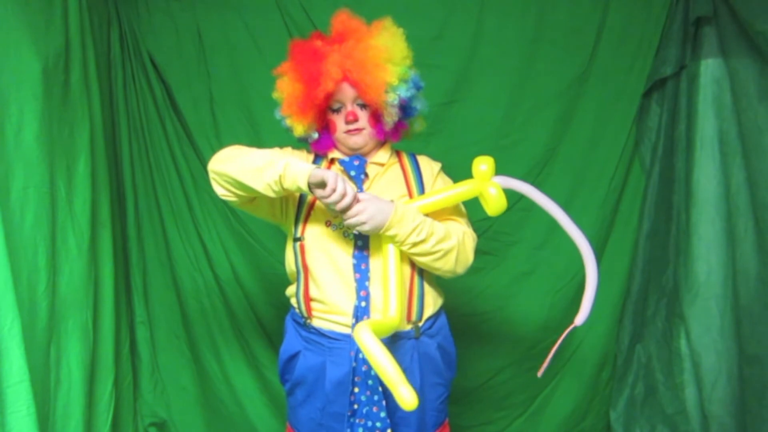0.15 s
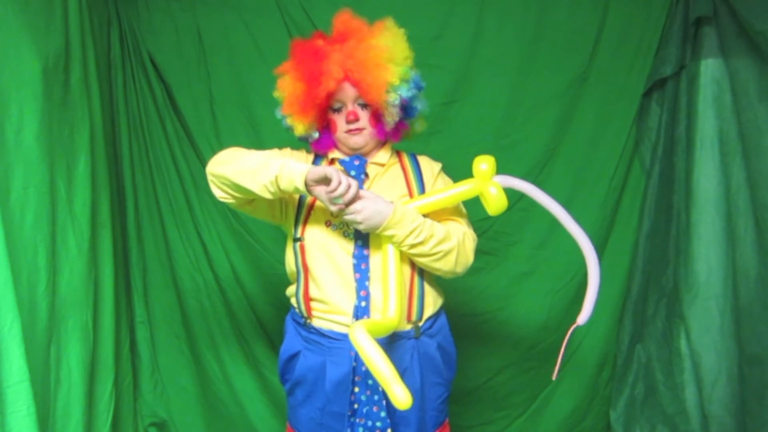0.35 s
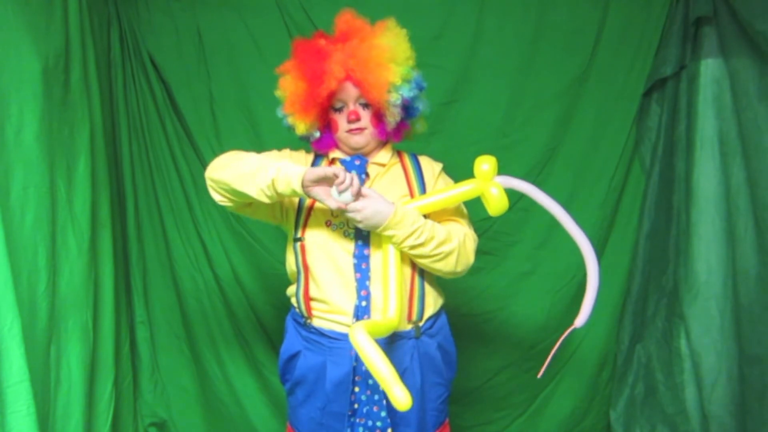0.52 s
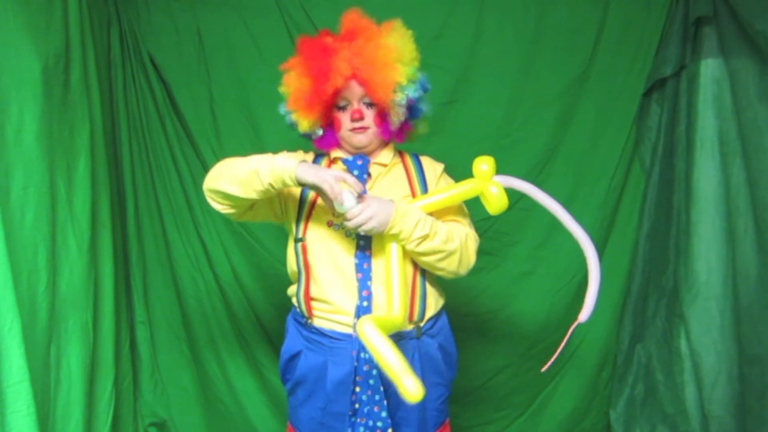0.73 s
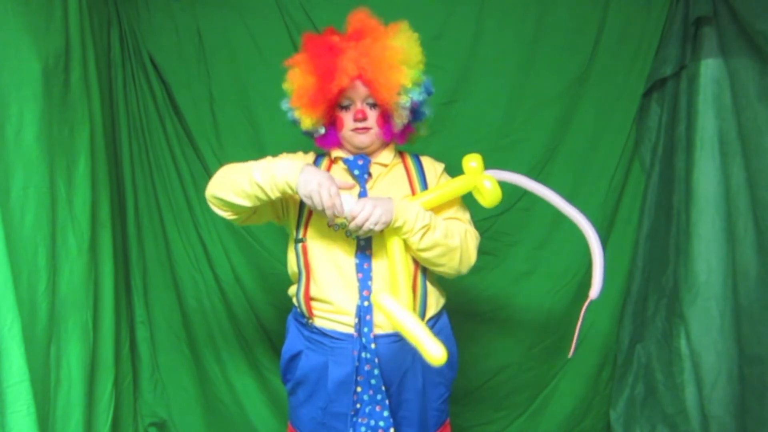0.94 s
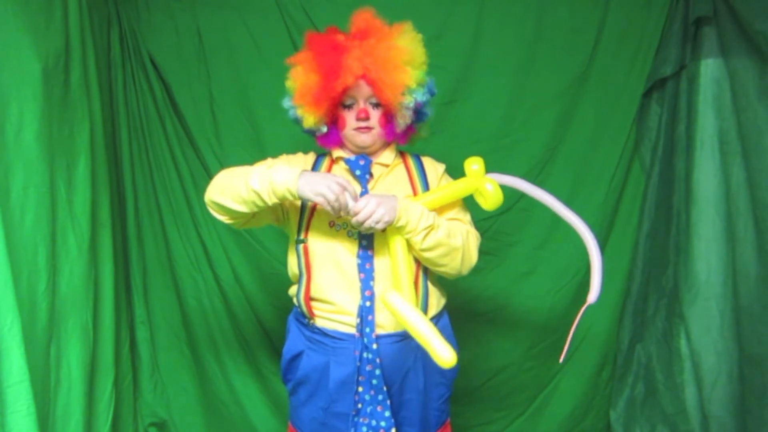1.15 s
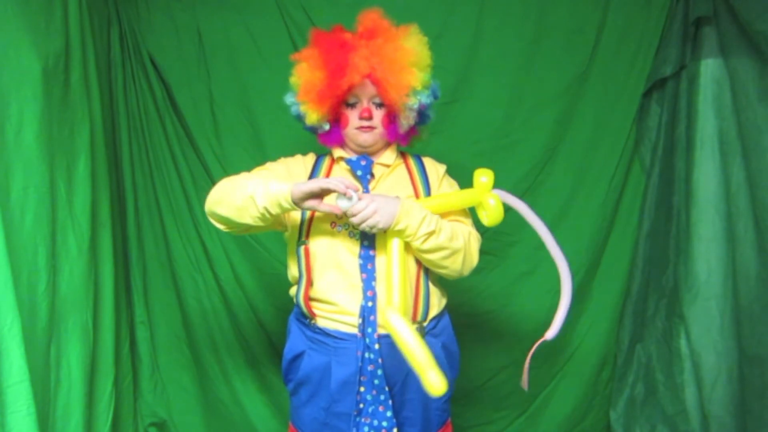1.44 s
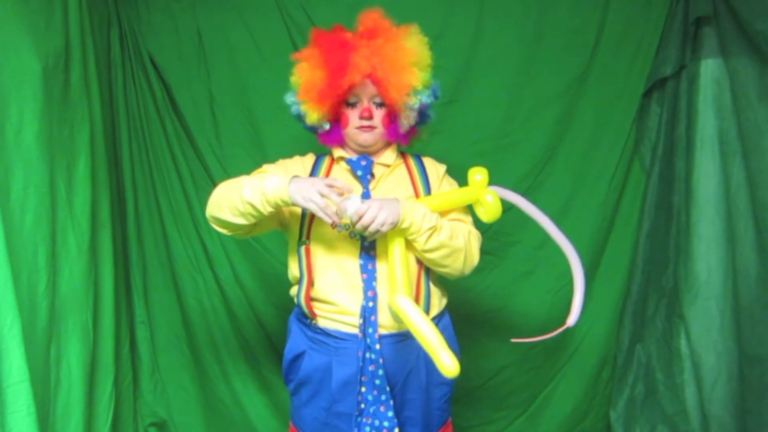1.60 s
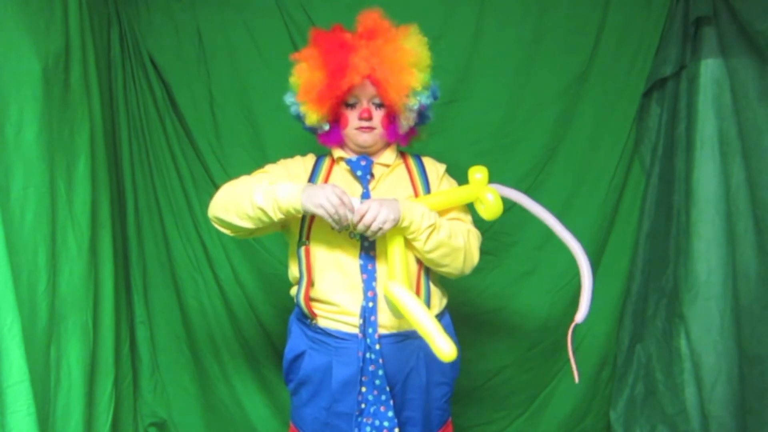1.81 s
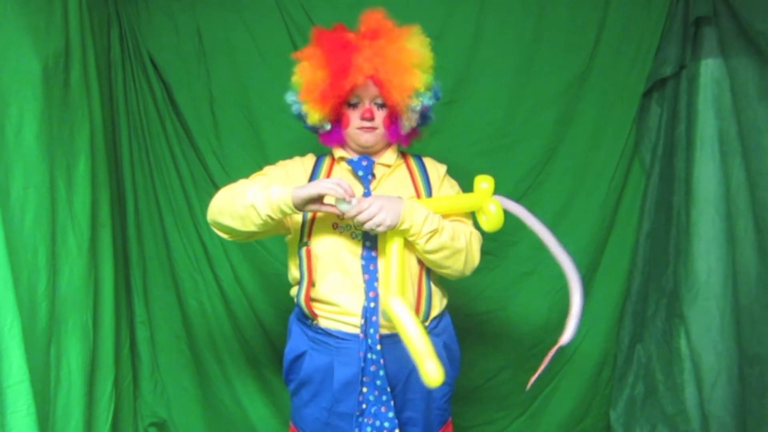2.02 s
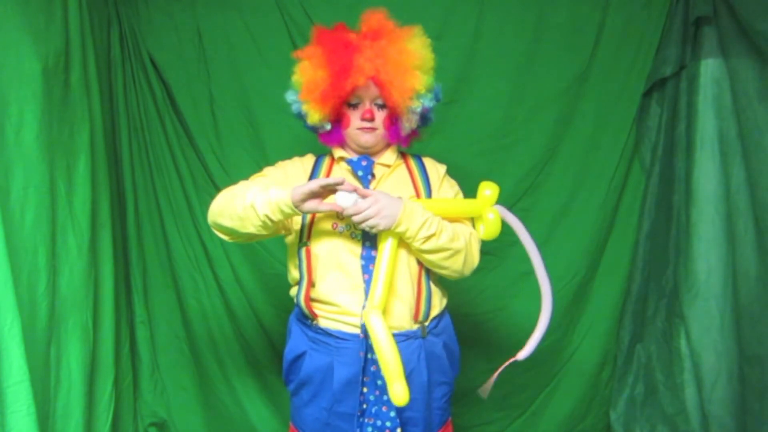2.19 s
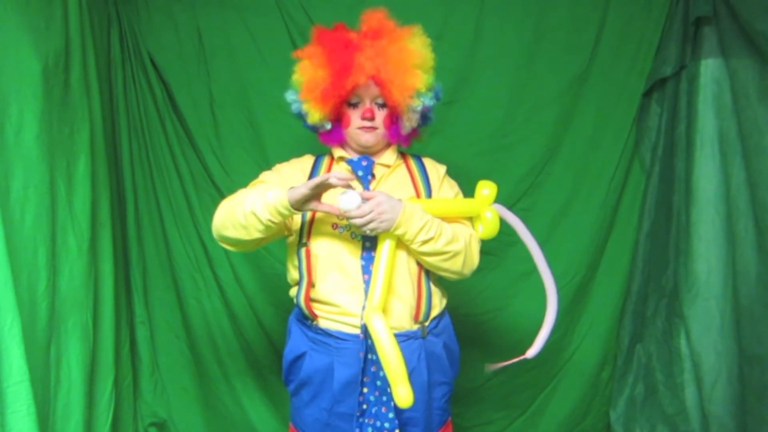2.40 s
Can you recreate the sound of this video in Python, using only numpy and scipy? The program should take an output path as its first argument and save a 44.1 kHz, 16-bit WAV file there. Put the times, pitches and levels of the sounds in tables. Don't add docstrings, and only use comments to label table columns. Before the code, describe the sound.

A small latex balloon is squeezed and twisted by gloved hands. Light, uneven rubbery clicks come until 0.4 seconds, then a hard creaking twist with short squeaks at 0.5-0.75. After a near-silent pause, another strong twist runs 1.1-1.5, with a loud squeak near 1.57. A gentler twist creaks at 1.8-2.3, then faint rubs. Soft fan hum and airy hiss continue in a small, fairly dry room, about two metres away.

```python
import sys
import numpy as np
from scipy import signal
from scipy.io import wavfile
from scipy.ndimage import uniform_filter1d

SR = 44100
rng = np.random.default_rng(int(sys.argv[2]) if len(sys.argv) > 2 else 0)


def wav_out(sig):
    wavfile.write(sys.argv[1], SR, np.round(np.clip(np.atleast_2d(sig).T, -1, 1) * 32767).astype(np.int16))


def amplitude_ratio(level_db):
    exponent = np.asarray(level_db, float) / 20
    return 10 ** exponent


N = 112454


def evened(x):
    return x / np.sqrt(np.mean(x ** 2) + 1e-20)


def read(points, hz):
    f, value = np.transpose(points)
    return np.interp(np.log(hz + 1), np.log(f + 1), value)


def add(mix, s, sound):
    part = mix[round(s * SR):][:len(sound)]
    part += sound[:len(part)]


def wander(rows, length):
    noise = rng.standard_normal((rows, length + 300))
    return signal.lfilter(np.hanning(300), 1, noise)[:, 300:] / np.sqrt(112)


def colour(x, points, under_db=-40):
    hz = abs(np.fft.fftfreq(4096, 1 / SR))
    below = (points[0][0] / 2, points[0][1] + under_db)
    logs = np.log(amplitude_ratio(read([below] + list(points), hz)))
    taps = np.fft.ifft(np.exp(np.conj(signal.hilbert(logs)))).real[:2048]
    taps = taps.reshape((1,) * (x.ndim - 1) + (-1,))
    return signal.oaconvolve(x, taps, axes=-1)[..., :x.shape[-1]]


def resonate(x, hz, width_hz):
    turn = np.exp(2j * np.pi * np.cumsum(hz * np.ones(len(x))) / SR)
    r = np.exp(-np.pi * width_hz / SR)
    return 2 * (turn * signal.lfilter([1 - r], [1, -r], x / turn)).real


# pitch in Hz, width in Hz, level in dB.
FAN_HUMS = [(126.2, 42, -56.5), (333, 35, -59.5), (411, 21, -53)]


def fan():
    t = np.arange(N) / SR
    hum = sum(amplitude_ratio(db) * evened(resonate(rng.standard_normal(N), hz, width)) for hz, width, db in FAN_HUMS)
    for hz, db in ((474, -46), (318, -57)):
        hum = hum + amplitude_ratio(db) * np.sin(2 * np.pi * hz * t)
    return hum


# pitch in Hz, level in dB.
AIR_TONE = [(25, -20.5), (370, -6.5), (460, -7), (1200, -10.5), (2330, -21.5), (6000, -38), (11000, -45.5),
            (16000, -51)]
# pitch in Hz, likeness from -1 to 1.
AIR_LIKENESS = [(30, -0.64), (100, -0.31), (200, 0.31), (400, 0.72), (1000, 0.87), (3770, 0.51),
                (15000, -0.039)]


def air():
    frames, hz = N // 256 + 5, np.fft.rfftfreq(1024, 1 / SR)
    a, b, c, d, patches = rng.standard_normal((frames, 513, 5)).T
    patches = uniform_filter1d(patches, size=12, axis=0)
    patches = evened(uniform_filter1d(patches, size=10, axis=1))
    same = np.clip(read(AIR_LIKENESS, hz), -1, 1)[:, None]
    left = a + 1j * b
    right = same * left + np.sqrt(1 - same ** 2) * (c + 1j * d)
    z = np.array([left, right]) * amplitude_ratio(read(AIR_TONE, hz)[:, None] + 1.6 * patches)
    return amplitude_ratio(-44) * evened(signal.istft(z, nperseg=1024, noverlap=768)[1][:, :N])


# pitch in Hz, time to fall by 60 dB in seconds.
ROOM_FADE = [(300, 0.24), (1000, 0.16), (4000, .18), (10000, 0.16)]


def room(x):
    room_db, wide_db = -5, -11.5
    taps = np.zeros((2, 22000))
    at = np.arange(150, 21900, 20) + rng.integers(0, 20, (2, 1088))
    np.put_along_axis(taps, at, rng.choice([-1., 1.], at.shape), 1)
    hz, t, z = signal.stft(taps, SR, nperseg=256)
    tail = signal.istft(z * amplitude_ratio(-60 * t / read(ROOM_FADE, hz)[:, None]), SR, nperseg=256)[1]
    mid, side = signal.fftconvolve(x[None], tail / np.linalg.norm(tail[0]), axes=1)[:, :N]
    lean = colour(side, [(300, -7.5), (3000, -7), (6000, 3.5), (10000, 6.0)])
    return x + amplitude_ratio(room_db) * mid + amplitude_ratio(wide_db) * np.array([lean, -lean])


def ring(length, level_db, hz):
    waver, rough, octave_db = .008, .4, -19.5
    t = np.arange(0, 1.42 * length, 1 / SR)
    wobble, sway = wander(2, len(t))
    turn = 2 * np.pi * np.cumsum(hz * (1 + waver * wobble)) / SR
    shape = np.sin(np.pi * (t / t[-1]) ** 0.57) * (1 + rough * sway)
    return amplitude_ratio(level_db + 5) * shape * (np.sin(turn) + amplitude_ratio(octave_db) * np.sin(2 * turn))


# start in seconds, length in seconds, level in dB, pitch in Hz.
RINGS = [(.05, .06, -42.5, 2220), (.128, .02, -38, 1884), (0.159, 0.024, -38, 1560),
         (0.199, 0.044, -38.5, 1560), (0.254, 0.052, -40.5, 1510), (.497, 0.024, -24, 1570),
         (.571, .014, -22, 1544), (0.628, .02, -31, 1560), (0.646, 0.019, -30.5, 636),
         (0.666, 0.031, -25.5, 1540), (.692, 0.022, -21.5, 1190), (0.709, 0.031, -32, 1650),
         (1.108, .018, -21.5, 1083), (1.15, 0.017, -28, 942), (1.279, 0.025, -23, 1560),
         (1.289, 0.047, -31, 955), (1.275, .035, -33, 760), (1.376, 0.034, -25.5, 1313),
         (1.376, 0.014, -23, 980), (1.41, 0.018, -28, 1516), (1.465, 0.016, -32, 646),
         (1.72, 0.091, -53, 1153), (1.815, 0.052, -42, 1154), (2.024, 0.02, -27.5, 1200),
         (2.032, 0.015, -25, 1736), (2.109, 0.0099, -28, 635), (2.301, 0.016, -40, 660),
         (.514, 0.019, -23, 1200), (1.116, .018, -32.5, 652), (1.136, 0.019, -31.5, 800),
         (1.927, 0.019, -37, 700), (1.868, 0.022, -36.5, 960), (2.249, 0.023, -35, 720),
         (1.132, 0.012, -26, 1527), (.585, .012, -28, 1350)]


def all_rings():
    out = np.zeros(N)
    for start, length, level_db, hz in RINGS:
        add(out, start, ring(length, level_db, hz))
    return out


# pitch in Hz, level in dB.
SQUEAK_TONE = [(400, 9), (470, 0.5), (640, -3.5), (940, -2), (1400, -16), (2300, -18.5), (3300, -34.5),
               (7000, -53)]


def squeak(length, level_db, hz, tilt_db, glide):
    waver, rough, dulling_db = .022, .35, -3
    rise_s, fall_s = 0.019, 0.008
    t = np.arange(0, length + 5 * fall_s, 1 / SR)
    wobble, *sway = wander(15, len(t))
    bend = glide * np.minimum(t / length - .5, .5)
    turns = np.cumsum(hz * (1 + bend + waver * wobble)) / SR
    slope_db = tilt_db + dulling_db * (t / length - .5)
    tone = np.zeros(len(t))
    for k in range(1, 15):
        level = amplitude_ratio(read(SQUEAK_TONE, k * hz) + slope_db * np.log2(k)) * (1 + rough * sway[k - 1])
        tone += level * np.cos(2 * np.pi * k * turns + 0.322 * k * k)
    shape = np.minimum(t / rise_s + 0.33, 1) * np.exp(-np.maximum(t - length, 0) / fall_s)
    return -amplitude_ratio(level_db) * shape * evened(tone)


# start in seconds, length in seconds, level in dB, slips per second,
# tilt in dB per octave, glide as a share of the pitch.
SQUEAKS = [
    (0.668, 0.0162, -26, 560, 7, -0.21),
    (.691, 0.018, -20, 394, 6, -.03),
    (1.567, 0.024, -19, 455, 4, .07),
    (2.258, 0.014, -29, 620, 4.5, -0.05),
    (1.553, 0.0063, -35, 420, 1, 0.018),
    (2.087, 0.011, -29, 635, -1, -.03),
]


def all_squeaks():
    out = np.zeros(N)
    for start, *settings in SQUEAKS:
        add(out, start, squeak(*settings))
    return out


def slips(clump):
    slips_per_s, spread_db, clump_db, rub_db = 1200, 3.6, 2.5, -10
    size = amplitude_ratio(spread_db * np.minimum(rng.exponential(1, N), 3) + clump_db * clump)
    clicks = evened(-size * (rng.random(N) < slips_per_s / SR))
    x = clicks + amplitude_ratio(rub_db) * rng.standard_normal(N)
    return x / np.sqrt(abs(uniform_filter1d(x ** 2, size=600)))


# time in seconds, pressure in dB, ring of the squeezed bulb in Hz,
# dryness of the grip in dB.
TWIST_A = [
    (0, -34.5, 1940, -8.5),
    (.12, -31, 1700, -7),
    (.2, -32.5, 1480, -4.5),
    (.285, -29.5, 1560, -13.5),
    (.32, -47, 1460, -4.5),
    (.4, -42, 1210, -10.5),
    (.49, -30, 1430, -8.5),
]
TWIST_B = [
    (0.482, -43.5, 1460, -29),
    (0.562, -23, 1350, -12.5),
    (.61, -21.5, 1030, -29),
    (0.661, -20.5, 630, -33),
    (0.701, -24.5, 1130, -27.5),
    (0.729, -30.5, 1350, -15),
    (0.768, -63, 1270, -31),
]
FIDGET = [
    (.93, -84, 790, -25),
    (1.0, -47, 895, -17),
    (1.102, -43.5, 1150, -23),
]
TWIST_C = [
    (1.123, -35, 850, -15),
    (1.24, -27, 1320, -9),
    (1.288, -20.5, 885, -16),
    (1.349, -22, 923, -12),
    (1.43, -43, 1140, -2.5),
    (1.481, -30, 806, -11),
    (1.551, -48.5, 900, -12),
]
AFTER = [
    (1.6, -44.5, 1200, -12),
    (1.67, -42.5, 1490, -10.5),
    (1.74, -53, 2000, -14),
    (1.802, -61, 1150, -14),
]
TWIST_D = [
    (1.802, -42, 800, -15),
    (1.9, -32.5, 910, -16),
    (2.01, -29, 1100, -9),
    (2.08, -29, 1120, -11.5),
    (2.149, -30.5, 1020, -19),
    (2.199, -32, 1070, -13),
    (2.239, -79, 790, -5),
]
SETTLE = [
    (2.359, -72, 800, -20),
    (2.42, -46, 880, -30),
    (2.48, -41.5, 830, -13),
    (2.55, -57, 775, -7),
]
SURGE_STARTS = [.487, .500, .570, .628, .670, .694, 1.110, 1.155, 1.376, 1.418, 1.436, 1.470, 1.557, 1.871,
                1.926, 2.032, 2.088, 2.109, 2.140, 2.246, 2.305]
# length in seconds, level in dB, ring in Hz, dryness in dB.
SURGES = [(0.013, -21.5, 1360, -12.5), (0.021, -14, 1490, -10.5), (0.013, -19.5, 1470, -7.5),
          (0.01, -42, 1500, -38), (0.024, -25.5, 1350, -37), (0.01, -24, 1080, -8.5),
          (0.018, -20, 1150, -13.5), (0.011, -33, 580, -28), (0.03, -19, 1150, -18),
          (0.0075, -15, 1300, -18), (0.0068, -23, 950, -14), (0.0078, -31.5, 780, -37),
          (0.0077, -25.5, 380, -17), (0.0075, -21.5, 2000, -11.5), (0.013, -29, 1300, -5),
          (0.0088, -17.5, 1580, -17.5), (0.0031, -17.5, 750, -4), (0.011, -30, 1500, -1),
          (0.0045, -28.5, 1240, 0.5), (0.028, -31, 710, -6.5), (0.0082, -42, 2000, -13)]
# time in seconds, peak in dB, ring in Hz, snap in dB.
JERKS = [(.134, -32, 1870, -13), (.328, -46.5, 1500, -3), (.638, -35, 1000, -7), (0.193, -30, 1480, -33),
         (0.216, -28, 1560, -29), (.231, -26, 1560, -27), (0.344, -32, 1070, -37), (.369, -35, 1540, -6.5),
         (.389, -19.5, 1074, -23), (0.971, -38.5, 795, -16), (1.032, -37.5, 1090, -10.5),
         (1.092, -36.5, 1040, -8.5), (1.816, -27, 1120, -18), (2.408, -35.5, 1030, -20)]


def grip():
    surge_rise, surge_t60 = .3, .055
    jerk_t60, jerk_trim_db = 0.061, -8
    t = np.arange(N) / SR
    parts = []
    for rows in (TWIST_A, TWIST_B, TWIST_C, TWIST_D, FIDGET, SETTLE, AFTER):
        s, db, hz, dry_db = np.transpose(rows)
        held = (t >= s[0]) * (t < s[-1])
        parts.append((amplitude_ratio(np.interp(t, s, db)) * held, np.interp(t, s, hz), np.interp(t, s, dry_db)))
    for s, (length, db, hz, dry_db) in zip(SURGE_STARTS, SURGES):
        rise = np.clip((t - s) / (surge_rise * length) + 0.56, 0, 1) * (t >= s)
        fall_db = 60 * np.maximum(t - s - length, 0) / surge_t60
        parts.append((rise * amplitude_ratio(db - fall_db), hz, dry_db))
    for s, db, hz, snap_db in JERKS:
        fall_db = 60 * abs(t - s) / jerk_t60
        parts.append((amplitude_ratio(db + jerk_trim_db - fall_db) * (t >= s), hz, snap_db + 12.5))
    body = 1e-5 + sum(level for level, hz, db in parts)
    ring_hz = (1e-2 + sum(level * hz for level, hz, db in parts)) / body
    crisp = sum(level * amplitude_ratio(db) for level, hz, db in parts)
    return body, ring_hz, crisp


# pitch in Hz, width in Hz, level in dB.
BALLOON = [(673, 44, -5.5), (980, 43, -4.5), (1104, 49, -10.5), (1226, 63, -5), (1350, 140, -12),
           (1560, 30, -2), (2160, 120, -5), (2767, 200, 0)]
# pitch in Hz, level in dB.
SKIN = [(420, -3.5), (650, 0), (2300, -1), (3300, -9), (5000, -5.5), (8000, -28)]
# pitch in Hz, level in dB.
CRACKLE = [(2600, 8), (3600, 5.5), (5500, 1), (8300, -11), (11000, -22), (16000, -12.5)]


def rubbing():
    bulb_width, wall_width = 230, 1200
    shared, kick, clump_s = 0.54, 3.5, .004
    body, ring_hz, crisp = grip()
    clump = evened(uniform_filter1d(rng.standard_normal(N), round(clump_s * SR)))
    common = shared * slips(clump)
    kick_times = np.array(SURGE_STARTS + [row[0] for row in JERKS])
    common[np.round(SR * kick_times).astype(int) + 8] -= kick

    def bulb(x):
        return colour(resonate(resonate(x, ring_hz, bulb_width), ring_hz, 3 * bulb_width), SKIN)

    def wall(x):
        return colour(resonate(resonate(x, 1.13 * ring_hz, wall_width), 1.49 * ring_hz, 2 * wall_width), SKIN)

    def modes(x):
        return colour(sum(amplitude_ratio(db) * resonate(x, hz, w) / np.sqrt(w) for hz, w, db in BALLOON), SKIN)

    def skin(x):
        return colour(x, CRACKLE, under_db=-46.5)

    out = np.zeros(N)
    for path, db, level in ((bulb, -10.5, body), (wall, -5, body), (modes, -12.5, body), (skin, -2, crisp)):
        drive = common + (1 - shared) * slips(clump)
        out += amplitude_ratio(db) * path(drive * level) / np.std(path(drive))
    return out


# pitch in Hz, level in dB.
SMALL_BODY = [(370, 0), (500, 0)]


def small(x):
    return amplitude_ratio(-2.0) * colour(x, SMALL_BODY, under_db=-60)


def scene():
    squeak_wet, ring_wet = .65, .45
    right_db = 1
    balloon, squeaks, rings = rubbing(), all_squeaks(), all_rings()
    in_room = room(small(balloon + squeak_wet * squeaks + ring_wet * rings))
    straight = small((1 - squeak_wet) * squeaks) + (1 - ring_wet) * rings
    heard = in_room + straight + air() + fan()
    return heard * amplitude_ratio(np.array([[-right_db], [right_db]]))


def low_pass(x):
    return signal.sosfilt(signal.butter(12, 16000, fs=SR, output="sos"), x)


# pitch in Hz, level in dB.
MIC = [(9500, 0.5), (10600, -3.5), (11300, -8), (12100, -37), (12600, -18), (13300, -11), (15900, -16.5),
       (16300, -54.5)]


def record(dry):
    mix = colour(dry, MIC, under_db=0.5)
    return low_pass(mix)


dry = scene()
out = record(dry)
wav_out(out)
```